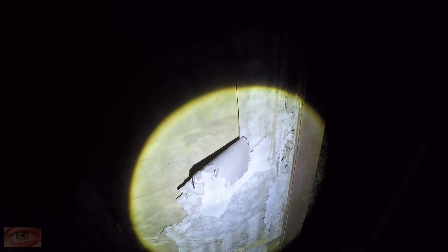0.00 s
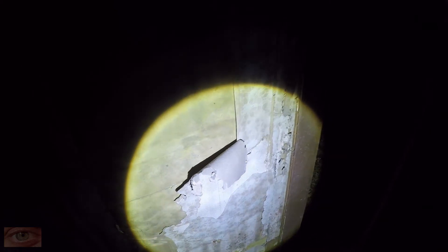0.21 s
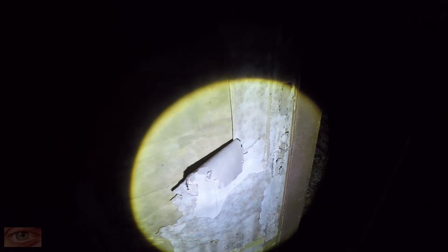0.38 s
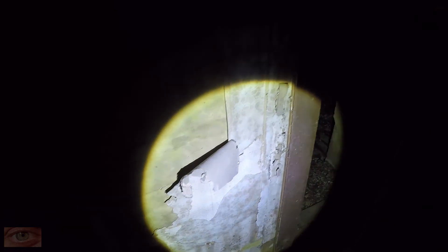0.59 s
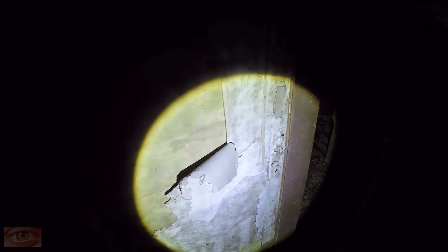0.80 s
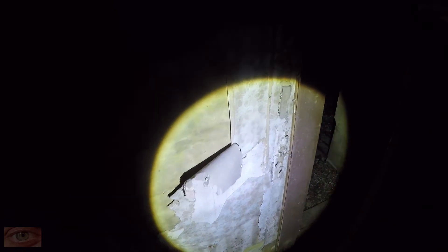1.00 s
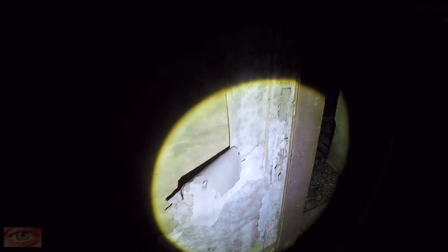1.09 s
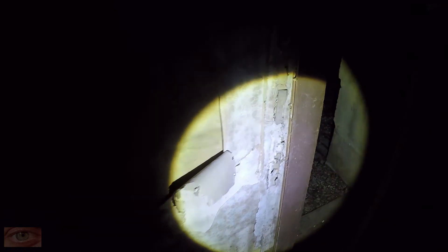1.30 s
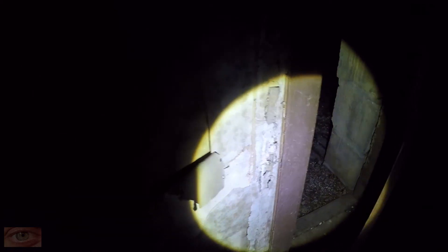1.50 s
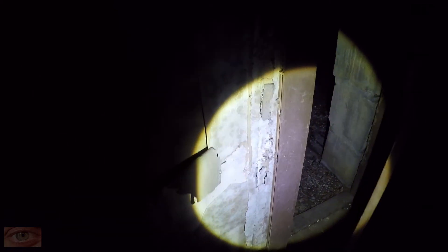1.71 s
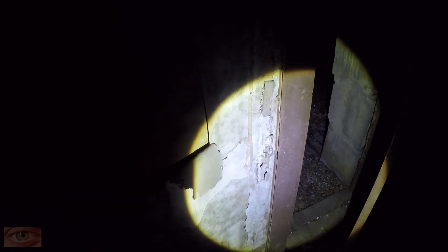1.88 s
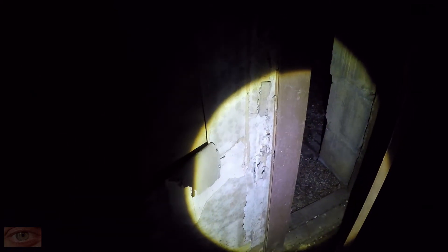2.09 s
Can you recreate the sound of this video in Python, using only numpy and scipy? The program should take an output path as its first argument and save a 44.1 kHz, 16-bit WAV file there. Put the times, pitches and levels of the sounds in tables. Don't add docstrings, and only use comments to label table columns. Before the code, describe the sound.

A stuck wooden door is shoved open with heavy booming thumps, sharp cracks and gritty scraping

```python
import sys
import numpy as np
from scipy import signal
from scipy.fft import rfft, irfft
from scipy.io import wavfile
from scipy.ndimage import uniform_filter1d

SR = 44100
rng = np.random.default_rng(int(sys.argv[2]) if len(sys.argv) > 2 else 0)


def int16_out(signal):
    q = np.round(np.clip(np.atleast_2d(signal).T, -1, 1) * 32767)
    wavfile.write(sys.argv[1], SR, q.astype(np.int16))


def attenuation_scalar(level_db):
    decades = np.asarray(level_db, float) / 20
    return 10 ** decades


N = 92610

# frequency in Hz, density in dB per Hz.
AIR_COLOUR = [(120, -57), (220, -1), (400, 4), (1300, 1.5), (2000, -3), (5000, -8), (9000, -20),
              (15000, -19)]
# time in seconds, level in dB.
SHUDDER_LEVEL = [(0.0, -44), (0.09, -33), (0.13, -41.5), (0.23, -33.5), (0.28, -17.5), (0.37, -31.5),
                 (0.5, -22.5), (0.7, -37), (0.77, -23), (1.18, -33.5), (1.27, -23), (1.63, -40),
                 (1.67, -33), (2.02, -44.5), (2.05, -41), (2.1, -54)]
# time in seconds, level in dB.
DRAG_FORCE = [(0, -69), (.22, -57.5), (.3, -44.5), (.36, -37.5), (.43, -37.5), (.47, -34), (.52, -40),
              (.72, -33.5), (.82, -44), (.95, -53), (1.08, -53), (1.19, -40.5), (1.225, -29),
              (1.245, -58.5), (1.74, -66), (1.81, -50.5), (1.92, -53.5), (2.1, -48)]
# frequency in Hz, density in dB per Hz.
GRIT_COLOUR = [(200, -1), (330, -2.5), (1240, -4), (2000, -7.5), (4500, -12.5), (7000, -22.5),
               (10000, -46.5), (15000, -27.5)]
# start in seconds, pitch in Hz, level in dB, t60 in seconds.
LATCH_TAPS = [
    (.7335, 8400, -41, .04),
    (.768, 7111, -38, .13),
    (1.211, 5050, -39, .035),
    (1.248, 7117, -48, .11),
]
# start in seconds, peak in dB, centre in Hz, t60 in seconds.
WOOD_CRACKS = [(0.225, -29, 1400, 0.13), (0.2295, -27, 3900, 0.15), (0.2408, -19.5, 2040, 0.079),
               (.255, -23, 1670, .12), (0.3546, -33, 2000, 0.031), (0.4885, -32, 2920, 0.031),
               (0.5792, -32, 1630, 0.047), (0.656, -36, 1600, 0.24), (0.6955, -26.5, 2120, 0.055),
               (0.7464, -11.5, 2480, 0.082), (0.754, -7, 3370, 0.07), (0.7522, -22.5, 10800, 0.078),
               (0.755, -10.5, 1210, 0.096), (0.763, -22, 4200, 0.062), (.783, -54, 1920, 0.074),
               (0.976, -44, 4500, 0.17), (1.1057, -42.5, 1060, 0.075), (1.1473, -32.5, 980, 0.049),
               (1.143, -49.5, 12500, 0.036), (1.1821, -29, 4470, 0.041), (1.1842, -29.5, 820, 0.04),
               (1.2175, -31, 2400, 0.18), (1.224, -50, 7260, 0.029), (1.24, -27, 3100, 0.084),
               (1.2482, -29, 2830, 0.039), (1.565, -50.5, 9500, 0.046), (1.8, -44, 2520, 0.065),
               (2.0647, -37, 2110, 0.12), (2.095, -33.5, 594, 0.054)]
# frequency in Hz, level in dB, t60 in seconds.
PANEL_MODES = [(330, -6, .07), (437, -2, .08), (555, -5, .06), (830, -8, .06), (1100, -1, .07),
               (1543, -5, .06), (2090, -6, .06), (2380, -7, .05), (3000, -3, .04), (3338, -3, .05),
               (3593, -4, .05), (4026, -4, .05), (4800, -9, .03), (13500, -8, .03)]
# start in seconds, pitch in Hz, peak in dB, rise in seconds,
# t60 in seconds.
LEAF_BOOMS = [(0.23, 166.2, -4.5, 0.009, .1), (0.2387, 87, -8.5, 0.0035, 0.16),
              (0.266, 47.8, -6, 0.011, 0.089), (0.32, 54.5, -31, 0.0065, 0.094),
              (0.351, 61, -18, 0.02, .15), (.424, 49.7, -17, 0.007, 0.24), (0.48, 52.2, -23, 0.008, 0.53),
              (.6562, 138.8, -9, 0.004, 0.34), (0.662, 77, -12, 0.014, 0.1),
              (0.671, 209, -16.5, 0.0065, 0.22), (.753, 97.7, 1.5, 0.0053, 0.14),
              (0.783, 57.6, -22, 0.017, 0.28), (0.789, 159, -10, 0.0033, 0.1),
              (1.188, 92.3, -36.5, 0.015, 0.15), (1.235, 74.5, -5.5, 0.014, 0.077),
              (1.266, 48.3, -18, 0.0041, 0.54), (1.262, 197.5, -27.5, 0.0041, 0.19),
              (1.267, 92.6, -18.5, 0.0086, 0.23), (1.324, 39.5, -44, 0.02, 0.11),
              (1.598, 215, -55, .05, 0.48), (1.789, 195.5, -46, 0.013, 0.32),
              (1.796, 95.3, -41, 0.03, 0.34), (2.042, 59.4, -19, 0.0084, 0.12),
              (2.066, 105, -26.5, 0.0077, 0.13), (2.094, 149, -30, 0.0072, .1)]

LEAF_HZ, LEAF_WIDTH_HZ = 105, 55.2


def band(x, hz, width_hz):
    return signal.lfilter(*signal.iirpeak(min(hz, .4 * SR), max(hz / width_hz, .3), fs=SR), x)


def band_twice(x, hz, width_hz):
    return band(band(x, hz, width_hz), hz, width_hz)


def dull(x, hz):
    return signal.sosfilt(signal.butter(4, hz, fs=SR, output="sos"), x)


def unit(x):
    return x / np.sqrt(np.mean(x ** 2))


def colour(x, shape):
    hz, db = np.array(shape).T
    f = np.arange(len(x) // 2 + 1) * SR / len(x) + 1
    gain = attenuation_scalar(np.interp(np.log(f), np.log(hz), db, left=-90))
    return unit(irfft(rfft(x) * gain, len(x)))


def curve(rows):
    s, db = np.array(rows).T
    return attenuation_scalar(np.interp(np.arange(N) / SR, s, db))


def walk(rate_hz):
    hold = int(SR / rate_hz)
    steps = np.repeat(rng.standard_normal(N // hold + 1), hold)
    return unit(uniform_filter1d(steps, hold)[:N])


def swell(at_s, rise_s, t60_s):
    since = np.maximum(np.arange(N) / SR - at_s, 0)
    rise = np.sin(np.pi / 2 * np.minimum(since / max(rise_s, 1e-4), 1)) ** 2
    fall = np.exp(-np.log(1000) * np.maximum(since - rise_s, 0) / t60_s)
    return since, rise * fall


def ringing(hz, width_hz):
    return unit(dull(band_twice(rng.standard_normal(N), hz, width_hz), 1.86 * hz))


def air():
    return attenuation_scalar(-55.5) * colour(rng.standard_normal(N), AIR_COLOUR)


def room(x):
    t60_s, centre_hz, level_db = .33, 2500, -21
    since = np.arange(SR // 2) / SR
    tail = band(rng.standard_normal(len(since)), centre_hz, 2 * centre_hz)
    tail *= np.exp(-np.log(1000) * since / t60_s) * (since > .006)
    return attenuation_scalar(level_db) * signal.fftconvolve(x, tail / np.sqrt(np.sum(tail ** 2)))[:N]


def shudder():
    hz, width_hz = 31, 16
    wobble = band(band(rng.standard_normal(N), hz, width_hz), hz, 2 * width_hz)
    evened = wobble / np.sqrt(uniform_filter1d(wobble ** 2, size=2600))
    return curve(SHUDDER_LEVEL) * dull(evened, 81)


def hinge():
    from_s, to_s, fade_s = 1.33, 1.72, .03
    t = np.arange(N) / SR
    fade = np.clip(np.minimum(t - from_s, to_s - t) / fade_s, 0, 1)
    pitch_hz = 1351 + 24 * walk(60)
    whine = np.sin(2 * np.pi * np.cumsum(pitch_hz) / SR)
    return attenuation_scalar(-61) * fade * attenuation_scalar(2.5 * walk(40)) * whine


def drag():
    grains_per_s, spread_db, flicker_db = 4000, 1.6, 1
    hit = rng.random(N) < grains_per_s / SR
    strength = 0.57 + hit * attenuation_scalar(spread_db * rng.exponential(size=N))
    grains = rng.standard_normal(N) * strength
    grit = colour(grains, GRIT_COLOUR) * attenuation_scalar(flicker_db * walk(90))
    leaf = attenuation_scalar(4.5) * ringing(LEAF_HZ, LEAF_WIDTH_HZ)
    force = curve(DRAG_FORCE)
    dust_level = attenuation_scalar(-50.5) * ((force / attenuation_scalar(-62.5)) ** 0.23 - 1)
    dust = dust_level * unit(band(grains[::-1], 6500, 6500))
    return force * (grit + leaf) + dust


def latch():
    out = np.zeros(N)
    for start_s, hz, db, t60_s in LATCH_TAPS:
        since, env = swell(start_s, 0.0025, t60_s)
        out += attenuation_scalar(db) * env * np.sin(2 * np.pi * hz * since) * attenuation_scalar(2.0 * walk(156.6))
    return out


def cracks():
    out = np.zeros(N)
    for start_s, db, hz, t60_s in WOOD_CRACKS:
        splinter = rng.standard_normal(N) * attenuation_scalar(1.5 * walk(400))
        burst = splinter * swell(start_s, .0025, t60_s)[1]
        tone = band_twice(burst, hz, hz * 1.3) * np.sqrt(SR / 4 / hz)
        tone = signal.lfilter(*signal.butter(2, min(1.72 * hz, .4 * SR), fs=SR), tone)
        knock = band_twice(burst, 550, 600) * 5
        out += attenuation_scalar(db) * (tone + attenuation_scalar(-9) * knock + attenuation_scalar(-36) * burst)
    panels = np.zeros(N)
    for hz, db, t60_s in PANEL_MODES:
        width_hz = np.log(1000) / np.pi / t60_s
        panels += attenuation_scalar(db) * band(out, hz, width_hz) * np.sqrt(hz * t60_s)
    return out + attenuation_scalar(-17) * panels


def booms():
    out, thud, rattle = np.zeros(N), np.zeros(N), np.zeros(N)
    for start_s, hz, db, rise_s, t60_s in LEAF_BOOMS:
        since, env = swell(start_s, rise_s, t60_s)
        out += attenuation_scalar(db) * env * np.sin(2 * np.pi * hz * since)
        thud += attenuation_scalar(db) * min(hz / 140, 1) ** 2 * swell(start_s, rise_s, 0.15)[1]
        rattle += attenuation_scalar(db) * swell(start_s, rise_s, 0.52)[1]
    out += attenuation_scalar(-21) * thud * ringing(338, 338)
    return out + attenuation_scalar(-22) * rattle * ringing(LEAF_HZ, LEAF_WIDTH_HZ)


def scene():
    sharp = cracks() + latch()
    return (air() + room(sharp) + shudder() + hinge() + drag() + sharp + booms())[None]


def low_pass(x):
    return signal.sosfilt(signal.butter(12, 16480, fs=SR, output="sos"), x)


def record(dry):
    overloaded = np.tanh(0.91 * dry) / 0.82
    top_cut = signal.ellip(10, .3, 80, 15350, fs=SR, output="sos")
    mix = signal.sosfilt(top_cut, overloaded)
    return low_pass(mix)


dry = scene()
out = record(dry)
int16_out(out)
```